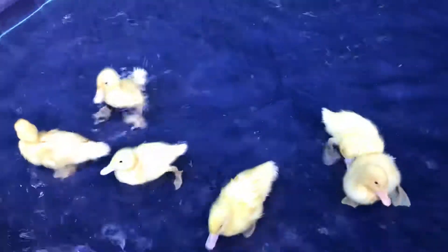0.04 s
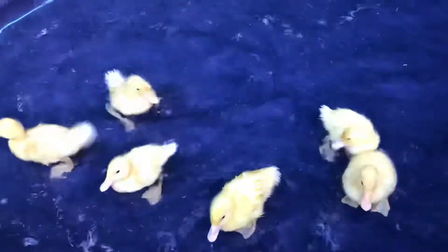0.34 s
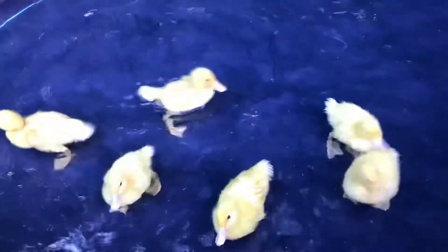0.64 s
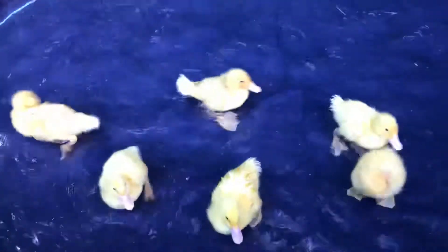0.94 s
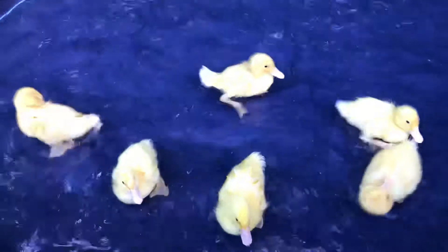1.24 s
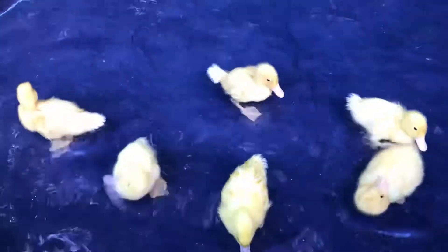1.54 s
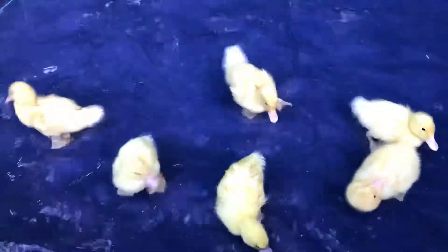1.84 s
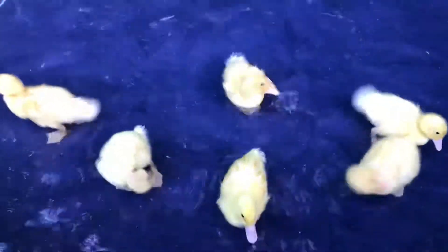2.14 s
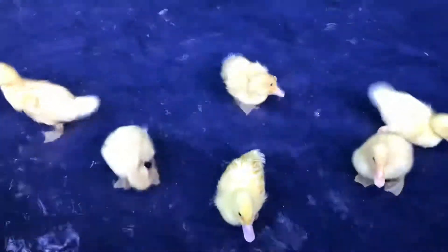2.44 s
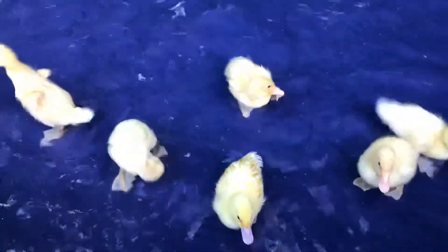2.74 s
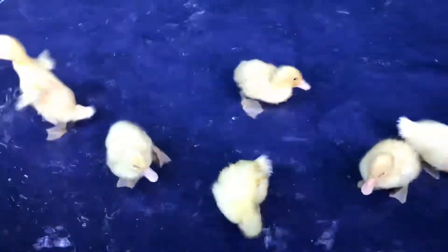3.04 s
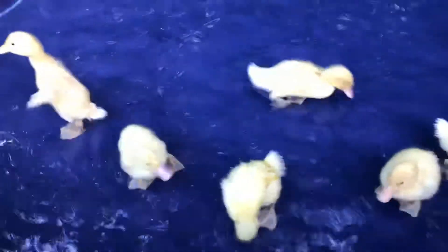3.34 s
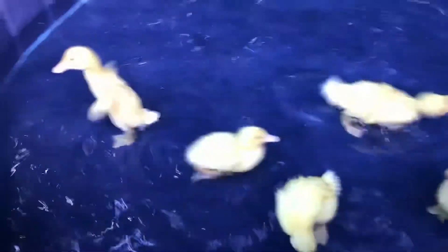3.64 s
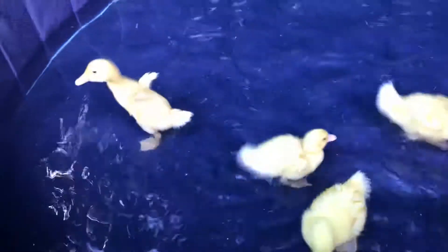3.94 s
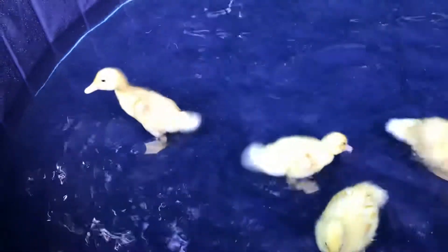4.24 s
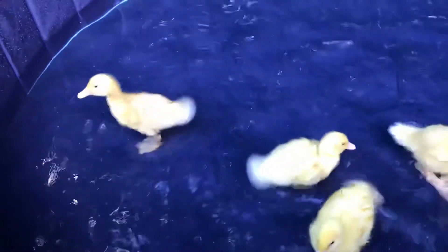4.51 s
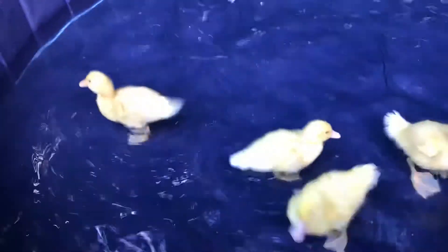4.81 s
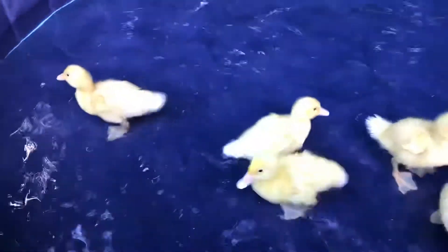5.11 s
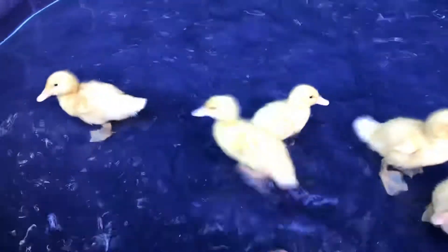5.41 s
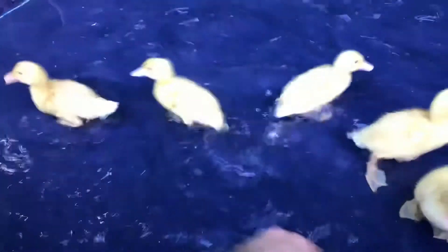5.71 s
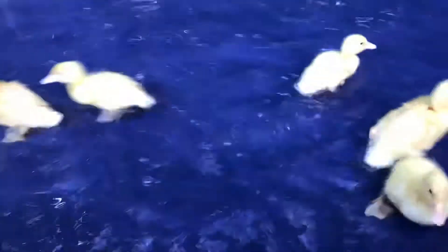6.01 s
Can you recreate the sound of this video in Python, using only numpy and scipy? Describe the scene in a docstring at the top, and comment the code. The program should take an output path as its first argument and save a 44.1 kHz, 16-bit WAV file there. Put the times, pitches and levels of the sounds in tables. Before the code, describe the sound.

Ducklings paddle in a shallow plastic pool in a quiet garden, heard from close by. Small drips tick and tiny bubbles plink irregularly, with a few light flicks of spray, then thin out. Near the end one duckling gives a single short, high, rising peep and darts off in a quick flurry of plops and splashes. A faint low outdoor rumble lies underneath.

```python
"""Drips tick and small bubbles ring as ducklings paddle in a shallow plastic pool in a quiet garden.
Each impact is a brief broadband pulse; each trapped bubble is a damped resonator. Near the end one
duckling gives a rising peep with both sides of its syrinx and darts off in a flurry of splashes.
The pool's walls add short reflections. Behind are a far bird, a soft rustle close by, two thin
insect bands, faint air and a low outdoor rumble with a machine's hum."""
import sys
import numpy as np
from scipy import signal
from scipy.fft import rfft, irfft, next_fast_len
from scipy.io import wavfile

SR = 44100
rng = np.random.default_rng(int(sys.argv[2]) if len(sys.argv) > 2 else 0)


def store_wav(level_fs):
    """Save 16-bit WAV to argv[1]."""
    pcm = np.round(np.clip(np.atleast_2d(level_fs), -1, 1) * 32767)
    wavfile.write(sys.argv[1], SR, pcm.T.astype(np.int16))


N = 272097
TIME = np.arange(N) / SR
CUTOFF_HZ = 16000


# air bubbles trapped by feet and bills: start_s, pitch_hz, peak_db, glide_share
CLEAR_BUBBLES = [ (0.0904, 1690, -52, 0.069), (.1756, 3070, -35.5, -0.48), (.2388, 3680, -43, .1),
                 (.313, 3200, -48, -0.15), (.5578, 2210, -51.5, -.15), (.6235, 6370, -51, 0),
                 (1.0194, 9050, -47.5, 0), (1.3946, 4930, -47, -0.043), (1.4283, 2968, -48.5, -0.19),
                 (1.4852, 2060, -36.5, -0.17), (1.5725, 976, -46, .1), (2.011, 805, -44, -.15),
                 (2.0216, 2280, -37.5, -0.5), (2.055, 2020, -46, -.15), (2.0775, 3200, -39, 0.12),
                 (2.0846, 4600, -34, -.05), (2.086, 1116, -48, 0.36), (2.1287, 1680, -39.5, 1),
                 (2.2574, 4420, -32.5, 0.19), (2.282, 3650, -47, 0.13), (2.3882, 1590, -50, 0.053),
                 (2.4042, 5850, -39.5, -.15), (2.4768, 3740, -42, 0.79), (2.8485, 998, -47, -0.063),
                 (3.0512, 908, -48, -0.38), (3.6566, 1154, -46.5, 0.73), (4.8198, 673, -41.5, -0.23),
                 (4.836, 1206, -46.5, -0.46), (5.3694, 6720, -33, 0.14), (5.369, 1690, -36, 0.44),
                 (5.419, 413, -46, 0.16), (5.427, 4530, -37.5, .1), (5.455, 670, -41, 0.5),
                 (5.544, 640, -40, 0.6), (5.5645, 2860, -32.5, 0.31), (5.566, 1530, -31, -0.07),
                 (5.567, 732, -37, 0), (5.7062, 523, -39.5, 0.08), (5.7074, 995, -36, -0.18),
                 (5.7557, 1656, -41, 0), (5.7623, 4050, -36.5, -0.17), (5.8353, 2310, -43, 0.045),
                 (5.9239, 1677, -45, 0.3), (5.9245, 571, -46, -0.21), (5.9429, 1253, -46, -0.036),
                 (5.957, 610, -49.5, 0.4), (6.0146, 2500, -43, 0.013), ]
# drops striking the surface: start_s, centre_hz, peak_db
DROP_IMPACTS = [ (.029, 7340, -39), (.0594, 8140, -33.5), (0.1752, 7450, -30.5), (1.2798, 6500, -42),
                (1.4856, 3820, -36.5), (1.5724, 8550, -35.5), (2.01, 9500, -35), (2.0668, 6900, -32.5),
                (2.1284, 7240, -33), (2.1998, 7200, -21), (2.3031, 6250, -36), (2.3827, 6400, -32),
                (2.3902, 8450, -37), (3.5912, 2090, -40.5), (3.6234, 10540, -35.5), (3.7393, 3740, -32.5),
                (3.8323, 11400, -36.5), (4.357, 3640, -41), (4.5445, 11700, -37.5), (4.8185, 1870, -39.5),
                (5.5398, 8000, -28), (5.7794, 8000, -34.5), (5.895, 6600, -38), (5.9857, 4550, -44),
                (6.144, 7080, -33), ]
def paddling(entry_db=-5, satellite_db=-14):
    """Air entrainment: a drop ticks on entry and traps a bubble, which sheds three weaker satellites."""
    out = np.zeros(N)
    for s, hz, db, glide in CLEAR_BUBBLES:
        add(out, s, from_db(db) * bubble(hz, 56 / hz, glide))   # 56 cycles: big bubbles ring longest
        add(out, s, from_db(db + entry_db) * tick(min(1.2 * hz, CUTOFF_HZ / 2)))
        for delay, pitch in rng.random((3, 2)):
            satellite_hz = min(hz * (.8 + .8 * pitch), CUTOFF_HZ)
            satellite = bubble(satellite_hz, 34 / satellite_hz, glide, birth_cycles=0.89)
            add(out, s + delay * 42 / hz, from_db(db + satellite_db) * satellite)
    for s, hz, db in DROP_IMPACTS:
        add(out, s, from_db(db) * tick(hz))
    return out


def bubble(hz, t60_s, glide, birth_cycles=0.42):
    """Damped resonance: a bubble rings as a dying sine, its pitch sliding near the surface; peak 1."""
    t = np.arange(int(t60_s * SR) + 2) / SR
    phase = 2 * np.pi * hz * (t + glide * t ** 2 / (2 * t60_s))
    envelope = from_db(-60 * t / t60_s) * (1 - np.exp(-t * hz / birth_cycles))
    return np.sin(phase) * envelope / envelope.max()


def tick(hz, spread=1.47, crack_s=0.00087, crack_db=-15, mist_s=0.015, mist_db=-34):
    """Impact transient: an impulse, a short crack and a trace of mist, mostly in one band; peak 1."""
    t = np.arange(SR // 40) / SR
    envelope = from_db(crack_db) * np.exp(-t / crack_s) + from_db(mist_db) * np.exp(-t / mist_s)
    hit = rng.standard_normal(len(t)) * envelope
    hit[0] = 1
    edges_hz = [hz / spread, min(hz * spread, CUTOFF_HZ)]
    band = signal.lfilter(*signal.butter(2, edges_hz, "band", fs=SR), hit)
    skirt = signal.lfilter(*signal.butter(1, [hz / 4, CUTOFF_HZ], "band", fs=SR), hit)
    sound = band + from_db(-15) * skirt
    return sound / np.abs(sound).max()


# hard kicks of webbed feet: start_s, cavity_hz, plop_db, slap_hz, slap_db, swell_s, churn_db
FOOT_KICKS = [ (5.3926, 1636, -12.5, 2800, -19.5, .005, -49),
              (5.4014, 1570, -20.5, 4600, -23.5, 0.01, -40.5), (5.4958, 1090, -30, 8000, -39, 0.0057, -61),
              (5.520, 2000, -26.5, 8000, -39, 0.023, -45), (5.566, 1400, -38, 8400, -25, 0.026, -47),
              (5.595, 292, -37.5, 8400, -26.5, .005, -56), (5.643, 920, -33.5, 3440, -23, 0.0074, -39),
              (5.6692, 1270, -26.5, 8200, -19.5, 0.0036, -39),
              (5.6783, 1090, -27.5, 5000, -46, 0.0068, -48.5),
              (5.7068, 1560, -23.5, 7000, -47, 0.0061, -47), ]
def kicks(plop_cycles=18.4, longest_plop_s=0.031):
    """Cavity resonance: a foot slaps the surface and punches a hollow whose pitch rises as it shuts."""
    out = np.zeros(N)
    for s, cavity_hz, plop_db, slap_hz, slap_db, _, _ in FOOT_KICKS:
        slap = tick(slap_hz, spread=1.36, crack_s=0.0011, crack_db=-19, mist_s=0.0075, mist_db=-32.5)
        ring_s = min(plop_cycles / cavity_hz, longest_plop_s)
        plop = bubble(cavity_hz, ring_s, glide=0.2, birth_cycles=0.48)
        add(out, s, from_db(slap_db) * slap)
        add(out, s, from_db(plop_db) * plop)
    return out


# low push of displaced water: frequency_hz, relative_db
GULP_SPECTRUM = [(140, -5.5), (280, 0.5), (600, -13)]
# light flicks that throw spray: peak_s, level_db
SPRAY_FLICKS = [(1.447, -56.5), (2.082, -44.5), (2.125, -47), (2.204, -52.5), (2.386, -60), (3.611, -59)]
def splashes(lag_s=0.0016, flick_swell_s=0.0079):
    """Splash noise: flicks throw spray; kicks also displace water and churn in a cloud of bubbles."""
    out = np.zeros(N)
    sheet = from_db(-6) * noise([(1500, 19.5), (4000, 4), (8000, 0), (15000, 1)])
    gulp = from_db(-17.5) * noise(GULP_SPECTRUM)
    for s, *_, swell_s, db in FOOT_KICKS:
        at = int(s * SR)
        churn = swarm(low_hz=605, high_hz=3200, cycles=19.5, range_db=26, count=160)
        splash = churn + gulp[at:at + len(churn)] + from_db(-3) * spray(sheet[at:])
        add_swell(out, s + lag_s, swell_s, from_db(db) * splash)
    for s, db in SPRAY_FLICKS:
        add_swell(out, s, flick_swell_s, from_db(db) * spray(sheet[int(s * SR):]))
    return out


def spray(sheet):
    """Atomisation: fine droplets ring over the hiss of a thrown sheet of water; rms 1."""
    drops = swarm(low_hz=2830, high_hz=14400, cycles=19, range_db=34, count=300)
    return rms_one(drops + sheet[:len(drops)])


def swarm(low_hz, high_hz, cycles, range_db, count):
    """Incoherent sum: bubbles of random pitch and strength merge for a fifth of a second; rms 1."""
    length = SR // 5
    out = np.zeros(length)
    for when, pitch, strength, glide in rng.random((count, 4)):
        hz = low_hz * (high_hz / low_hz) ** pitch
        at = int(when * length)
        ring = bubble(hz, cycles / hz, 0.33 * glide, birth_cycles=0.93)[:length - at]
        out[at:at + len(ring)] += from_db(range_db * strength) * np.sqrt(hz) * ring
    return rms_one(out)


# how busily the ducklings paddle: time_s, activity_ratio (1 = busy)
PADDLING_ACTIVITY = [(0, 1.1), (1.1, .2), (1.5, 0.65), (1.8, .15), (2.1, 1.1), (2.8, 1.07), (3.1, .45),
                     (3.65, 0.69), (4.1, 0.16), (5.2, 0.16), (5.7, 1.74), (6.17, 1.5)]
def patter(gurgle_onset=1.1):
    """Poisson arrivals: drops, fizz and taps come faster with activity; only churned water gurgles."""
    activity, = in_time(PADDLING_ACTIVITY)
    churning = np.maximum(activity - gurgle_onset, 0)
    drops = droplets(60 * activity, low_hz=2660, high_hz=8000, cycles=20, floor_db=-59, range_db=9.5)
    fizz = droplets(75 * activity, low_hz=11200, high_hz=15800, cycles=11.7,
                    floor_db=-60.5, range_db=17.5)
    gurgles = droplets(110 * churning, low_hz=597, high_hz=2500, cycles=45, floor_db=-55.5, range_db=5)
    strays = taps(4 * activity ** 2, low_hz=4460, high_hz=10600, floor_db=-44, range_db=5.5)
    return drops + fizz + gurgles + strays


def droplets(per_s, low_hz, high_hz, cycles, floor_db, range_db):
    """Bubble resonance: drops run off feathers and bills at random, each trapping air that rings."""
    out = np.zeros(N)
    for s, hz, strength in arrivals(per_s, low_hz, high_hz):
        ring = bubble(hz, cycles / hz, glide=0.021, birth_cycles=1.0)
        add(out, s, from_db(floor_db + range_db * strength ** 2) * ring)
    return out


def taps(per_s, low_hz, high_hz, floor_db, range_db):
    """Impact alone: stray drops land at random without trapping air."""
    out = np.zeros(N)
    for s, hz, strength in arrivals(per_s, low_hz, high_hz):
        add(out, s, from_db(floor_db + range_db * strength) * tick(hz))
    return out


# the strong and weak sides of the syrinx: time_s, pitch_hz, level_db
STRONG_SIDE = [(5.290, 1497, -53), (5.298, 2020, -45.5), (5.308, 2470, -32.5), (5.320, 2637, -31),
               (5.332, 2680, -27.5), (5.342, 2780, -35), (5.356, 2830, -25), (5.361, 2755, -29),
               (5.376, 2785, -36), (5.389, 3056, -34.5), (5.402, 3320, -49), (5.425, 3420, -62)]
WEAK_SIDE = [(5.310, 1674, -73), (5.340, 2180, -58), (5.353, 2430, -58), (5.372, 2630, -52),
             (5.390, 2600, -59)]
# their harmonics, from the fundamental up: gain_db
STRONG_HARMONICS = [-2, -25.5, -35, -34, -47]
WEAK_HARMONICS = [7, -2, -11, -18]
def peep():
    """Biphonation: the two sides of the syrinx vibrate at once, each at its own pitch."""
    strong = syrinx_side(STRONG_SIDE, STRONG_HARMONICS, jitter=0.0074, flutter_db=1.5)
    weak = syrinx_side(WEAK_SIDE, WEAK_HARMONICS, jitter=0.0105, flutter_db=5.5)
    return strong + weak


def syrinx_side(contour, harmonics_db, jitter, flutter_db):
    """Nearly periodic vibration: a harmonic tone that flutters quickly in pitch and level."""
    hz, db = in_time(contour)
    phase = 2 * np.pi * np.cumsum(hz * (1 + jitter * drift(400))) / SR
    gate = np.clip(np.minimum(TIME - contour[0][0], contour[-1][0] - TIME) / 0.0017, 0, 1)
    tone = sum(from_db(gain_db) * np.sin(k * phase) for k, gain_db in enumerate(harmonics_db, 1))
    return np.sqrt(2) * gate * from_db(db + flutter_db * drift(260)) * tone


def pool_walls(x, wet_db, first_s=0.0032, t60_s=0.14, dull_hz=4000):
    """Reverberation: short, dull reflections between the pool's sides and the water."""
    t = np.arange(SR // 4) / SR
    echoes = rng.standard_normal(len(t)) * from_db(-60 * t / t60_s) * (t > first_s)
    echoes = signal.lfilter(*signal.butter(1, dull_hz, fs=SR), echoes / np.linalg.norm(echoes))
    return x + from_db(wet_db) * signal.fftconvolve(x, echoes)[:N]


# a far bird's whistles: start_s, length_s, top_pitch_hz, arch_share, level_db
BIRD_CALLS = [(3.159, .19, 2333, 0.049, -65.5), (3.815, 0.1, 1734, .16, -67),
              (4.411, 0.186, 2400, 0.055, -65.5)]
def far_bird(blur_hz=330):
    """Multipath propagation: many paths through the garden blur the pitch of faint arched whistles."""
    out = np.zeros(N)
    for s, length_s, hz, arch, db in BIRD_CALLS:
        u = np.linspace(-1, 1, int(length_s * SR))
        paths = (drift(blur_hz) + 1j * drift(blur_hz))[:len(u)]
        whistle = np.exp(2j * np.pi * np.cumsum(hz * (1 - arch * u ** 2)) / SR)
        add(out, s, from_db(db) * np.sqrt(1 - u ** 2) * np.real(paths * whistle))
    return out


# soft rustles close by: peak_s, swell_s, level_db
RUSTLE_SWELLS = [(4.671, 0.2, -65), (5.01, 0.15, -58), (5.62, 0.19, -61.5), (6.08, 0.43, -64)]
# their colour: frequency_hz, relative_db
RUSTLE_SPECTRUM = [(300, -36), (900, -16), (1450, 4.5), (2500, -2.5), (4000, -3.5), (8000, -4.5),
                   (15500, -10)]
def rustle(rest_db=-71, flicker_db=2.65):
    """Amplitude modulation: flickering noise swells above a faint resting level."""
    swells = sum(from_db(db) * np.exp(-((TIME - s) / swell_s) ** 2) for s, swell_s, db in RUSTLE_SWELLS)
    envelope = np.hypot(swells, from_db(rest_db)) * from_db(flicker_db * drift(110))
    return envelope * noise(RUSTLE_SPECTRUM)


# two insect bands: frequency_hz, relative_db
LOW_BAND = [(4000, -23), (4400, -13), (4750, -5), (5150, -5), (5400, -11.5), (5800, -23)]
HIGH_BAND = [(6500, -68), (7000, -5), (7300, -3), (7650, 1.5), (8000, 4), (8450, -4.5), (8900, -13),
             (9800, -43.5)]
# course of the lower band: time_s, level_db
LOW_BAND_LEVEL = [(0.0, -71), (1.39, -69.5), (2.19, -69), (2.81, -67), (2.95, -71), (3.17, -68.5),
                  (3.3, -68.5), (5.25, -67)]
def insects():
    """Band-limited noise: two choruses blend into thin bands near 5 and 8 kHz."""
    low_db, = in_time(LOW_BAND_LEVEL)
    low = chorus(LOW_BAND, swell_db=3.0, swell_hz=22, count=6)
    high = chorus(HIGH_BAND, swell_db=0.5, swell_hz=37, count=10)
    return from_db(low_db - 0.5) * low + from_db(-68.5) * high


def chorus(spectrum, swell_db, swell_hz, count):
    """Independent sources: each insect keeps to a slice of the band and swells on its own; rms 1."""
    size = next_fast_len(N, real=True)
    band = rfft(noise(spectrum), size)
    edges_hz = [spectrum[0][0], spectrum[-1][0]]
    owner = np.interp(np.fft.rfftfreq(size, 1 / SR), edges_hz, [0, count - 1]).round()
    voices = (irfft(band * (owner == k), size)[:N] for k in range(count))
    return rms_one(sum(voice * from_db(swell_db * drift(swell_hz)) for voice in voices))


# far air and steady hiss: frequency_hz, relative_db
AIR_SPECTRUM = [(150, 8), (300, 3.5), (500, 0), (850, 1.5), (1300, -1.5), (1900, -11.5), (2600, -27.5),
                (4000, -38)]
HISS_SPECTRUM = [(500, -6), (2500, 23.5), (3600, 12.5), (6300, -9), (9000, 0.5), (11000, -3.5), (15500, -1)]
# course of the far air: time_s, level_db
AIR_COURSE = [(0.0, -67.5), (0.34, -67.5), (1.2, -63.5), (2.48, -68), (3.45, -67.5), (3.79, -64),
              (4.28, -68), (4.99, -65), (5.25, -69)]
def air(gain_db=3, hiss_db=-71):
    """Ambient noise floor: far air rises and falls slowly over a steady hiss."""
    air_db, = in_time(AIR_COURSE)
    return from_db(air_db + gain_db) * noise(AIR_SPECTRUM) + from_db(hiss_db) * noise(HISS_SPECTRUM)


# low outdoor rumble: frequency_hz, relative_db
RUMBLE_SPECTRUM = [(22, -37), (36, -1), (60, 4), (80, 4), (108, 1), (138, -7), (170, -8), (300, -36.5)]
# a far machine's tones, against the rumble's noise: pitch_hz, relative_db
HUM_TONES = [(75.4, -3), (138, -8.5)]
# course of both together: time_s, level_db
RUMBLE_COURSE = [(0.1, -60.5), (0.62, -57), (0.65, -59.5), (2.07, -56), (2.31, -61.5), (2.94, -55.5),
                 (3.74, -62.5), (6.1, -60)]
def rumble(gain_db=1.03):
    """Tones in noise: a far machine's hum wanders in level and phase within the low rumble."""
    rumble_db, = in_time(RUMBLE_COURSE)
    hum = sum(from_db(db + 2 * drift(7.1)) * np.sin(2 * np.pi * hz * TIME + 1.33 * drift(6))
              for hz, db in HUM_TONES)
    return from_db(rumble_db + gain_db) * rms_one(noise(RUMBLE_SPECTRUM) + hum)


def noise(spectrum):
    """Spectral shaping: noise follows (frequency_hz, relative_db) and rolls off past the ends; rms 1."""
    hz, db = np.transpose(spectrum)
    size = next_fast_len(N, real=True)
    f = np.maximum(np.fft.rfftfreq(size, 1 / SR), 1)
    skirts = np.minimum(f / hz[0], 1) ** 3 * np.minimum(hz[-1] / f, 1) ** 3
    colour = skirts * from_db(np.interp(np.log(f), np.log(hz), db))
    return rms_one(irfft(rfft(rng.standard_normal(size)) * colour, size)[:N])


def arrivals(per_s, low_hz, high_hz):
    """Poisson process: events as (start_s, pitch_hz, strength from 0 to 1)."""
    times = TIME[rng.random(N) < per_s / SR]
    pitch, strength = rng.random((len(times), 2)).T
    return zip(times, low_hz * (high_hz / low_hz) ** pitch, strength)


def drift(per_s):
    """Random modulation through per_s new values a second."""
    knots = rng.standard_normal(8192)
    return np.interp(TIME * per_s, np.arange(len(knots)), knots)


def add(out, s, sound):
    """Superposition: mix a sound in from time s."""
    at = int(np.clip(round(s * SR), 0, N - 1))
    out[at:at + len(sound)] += sound[:N - at]


def add_swell(out, peak_s, swell_s, sound):
    """Asymmetric envelope: mix in a sound that swells until peak_s and dies away more slowly."""
    t = (np.arange(len(sound)) - len(sound) // 3) / SR
    skewed = np.where(t < 0, 1.35 * t, t / 1.25)
    envelope = signal.windows.tukey(len(t), .3) / np.cosh(skewed / swell_s)
    add(out, peak_s + t[0], envelope * sound)


def in_time(rows):
    """Interpolate each column of a curve at every sample."""
    s, *columns = np.transpose(rows)
    return [np.interp(TIME, s, column) for column in columns]


def from_db(db):
    """Decibels to amplitude ratio."""
    return 10 ** (np.asarray(db) / 20)


def rms_one(x):
    """Scale to rms 1."""
    return x / np.sqrt(np.mean(x ** 2) + 1e-20)


def scene():
    """Direct and reflected sound: the water echoes in the pool; the peep, above it, a little less."""
    water = pool_walls(paddling() + kicks() + splashes() + patter(), wet_db=-11.5)
    call = pool_walls(peep(), wet_db=-12.5)
    return (water + call + far_bird() + rumble() + air() + insects() + rustle())[None]


# peak and dip of the microphone port: centre_hz, width_hz, gain_db
PORT_RESPONSE = [(8400, 610, 3.5), (10520, 1200, -6)]
def record(dry):
    """Port resonance: the microphone adds a treble peak and dip; a steep low-pass cuts the top."""
    for hz, width_hz, db in PORT_RESPONSE:
        band = signal.lfilter(*signal.iirpeak(hz, hz / width_hz, fs=SR), dry)
        dry = dry + (from_db(db) - 1) * band
    return signal.sosfilt(signal.ellip(10, .1, 80, CUTOFF_HZ, fs=SR, output="sos"), dry)


dry = scene()
out = record(dry)
store_wav(out)
```